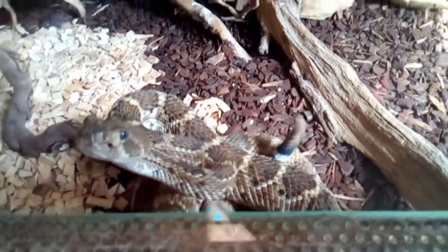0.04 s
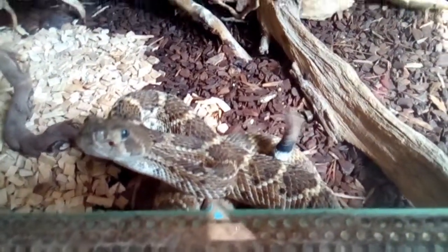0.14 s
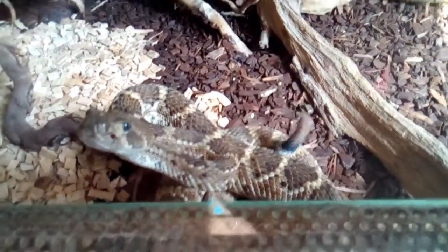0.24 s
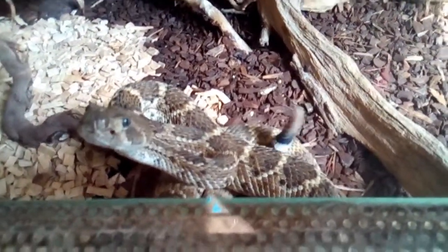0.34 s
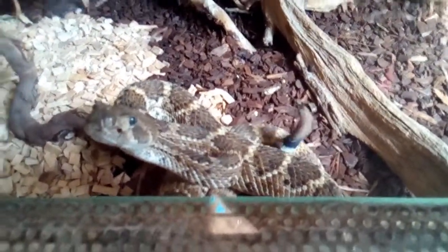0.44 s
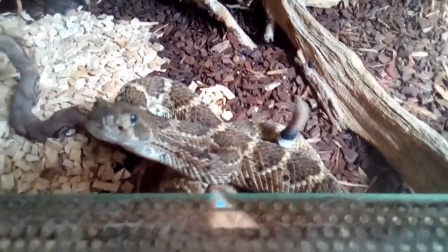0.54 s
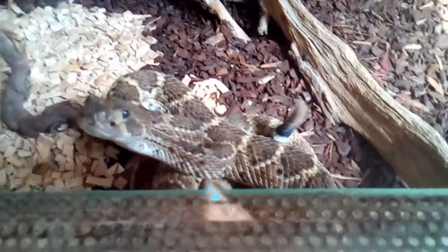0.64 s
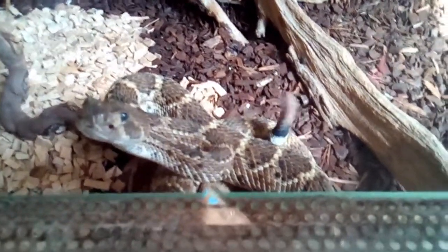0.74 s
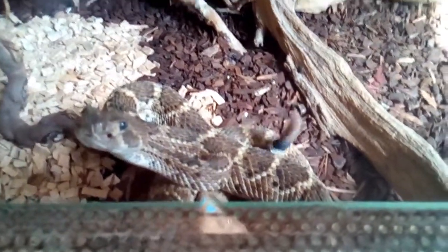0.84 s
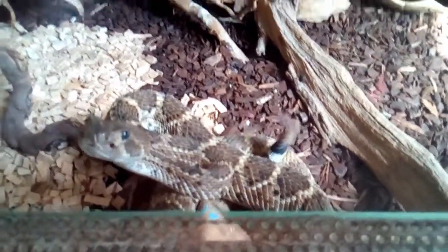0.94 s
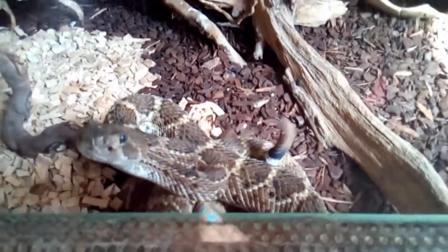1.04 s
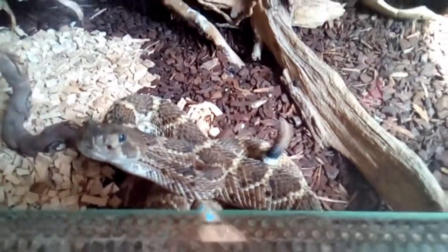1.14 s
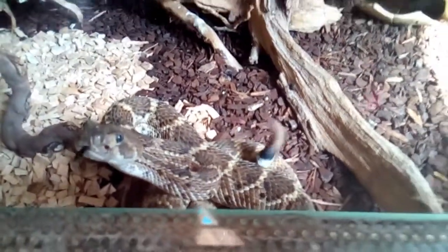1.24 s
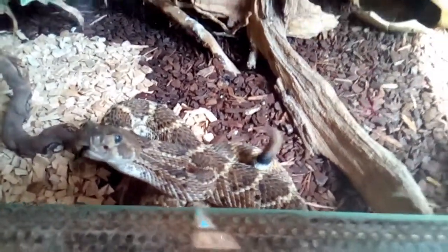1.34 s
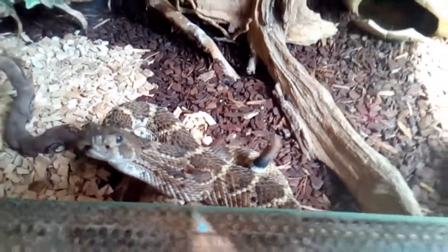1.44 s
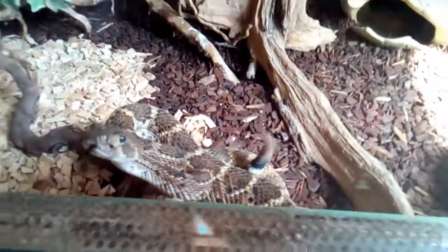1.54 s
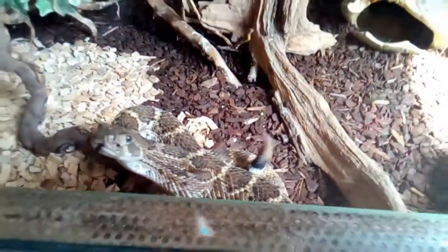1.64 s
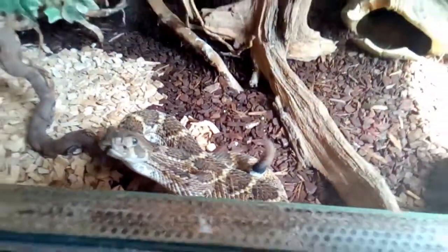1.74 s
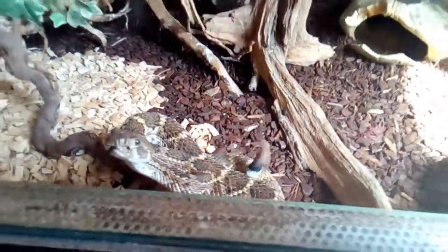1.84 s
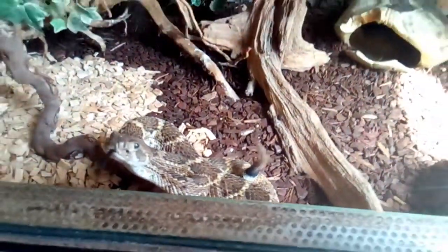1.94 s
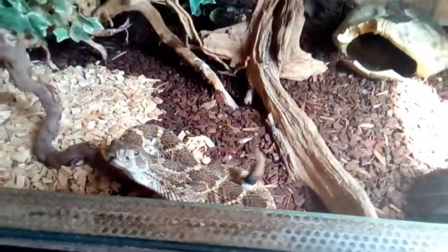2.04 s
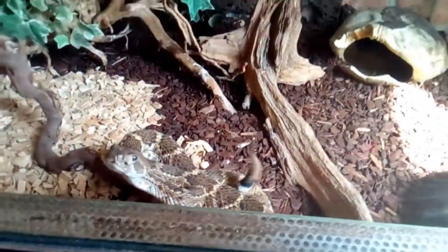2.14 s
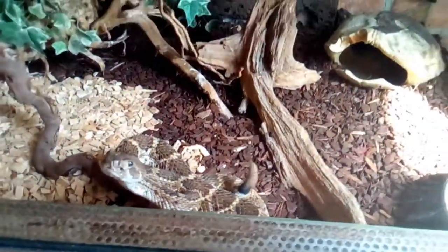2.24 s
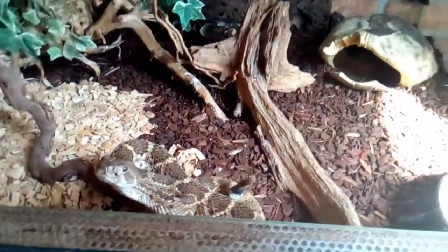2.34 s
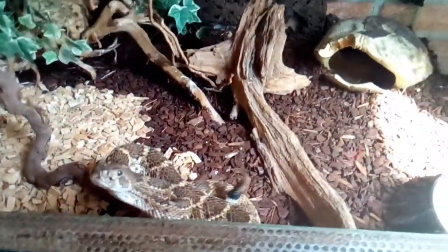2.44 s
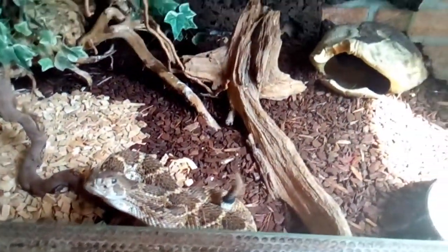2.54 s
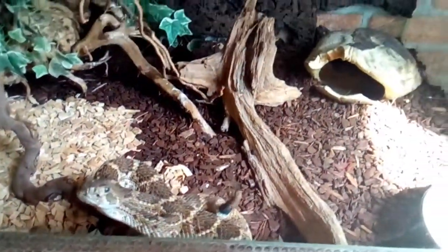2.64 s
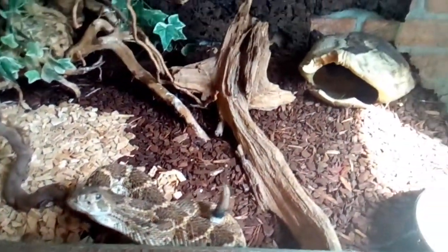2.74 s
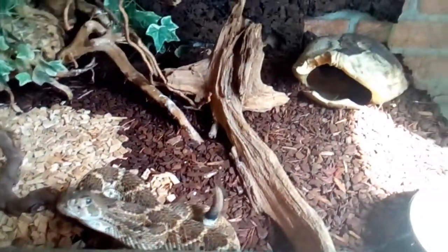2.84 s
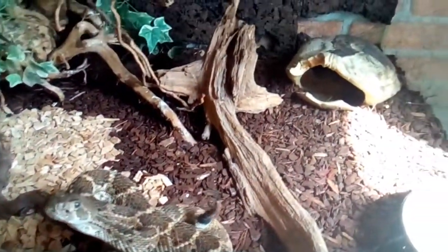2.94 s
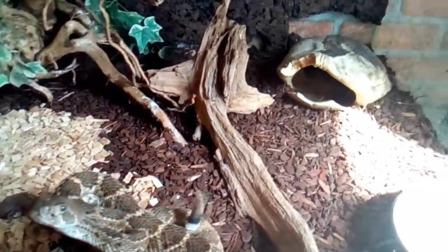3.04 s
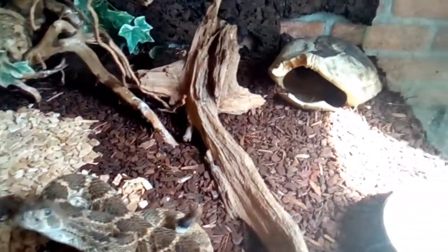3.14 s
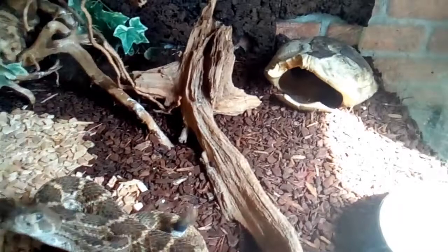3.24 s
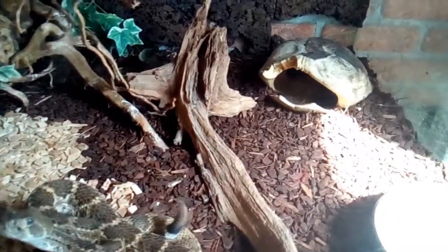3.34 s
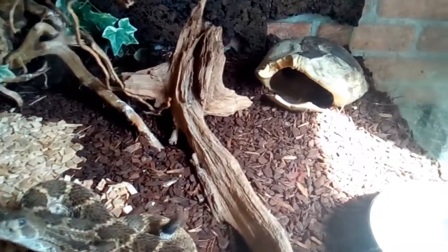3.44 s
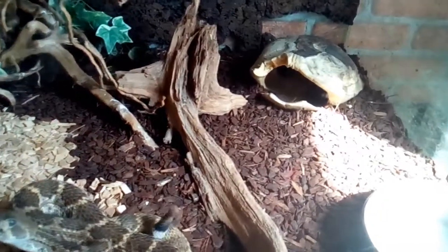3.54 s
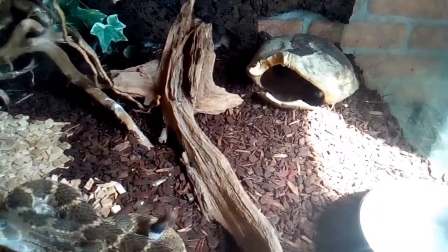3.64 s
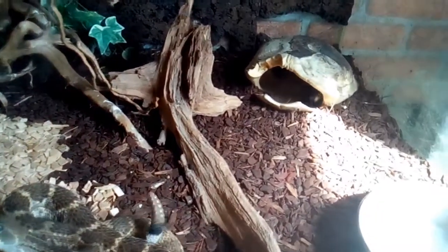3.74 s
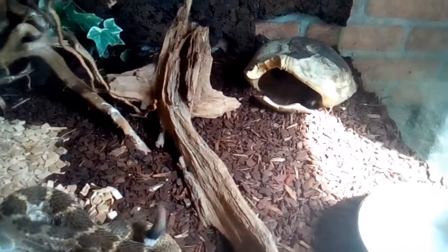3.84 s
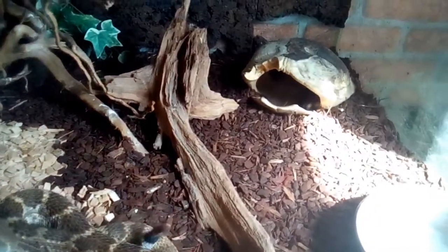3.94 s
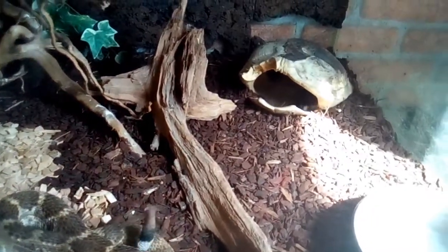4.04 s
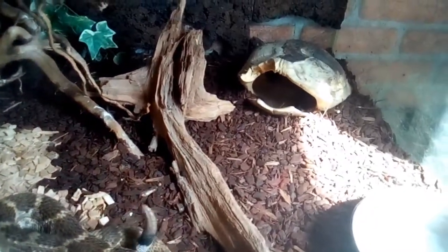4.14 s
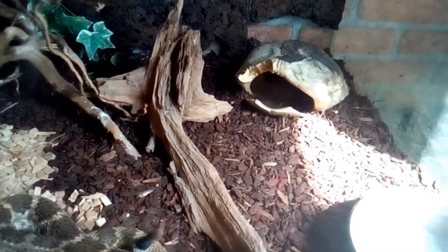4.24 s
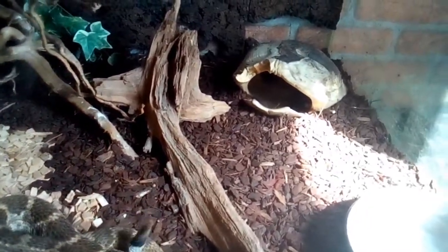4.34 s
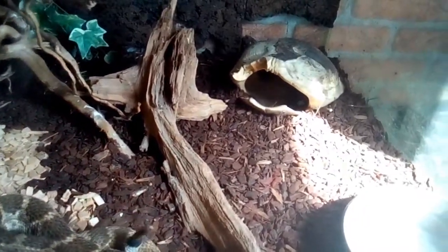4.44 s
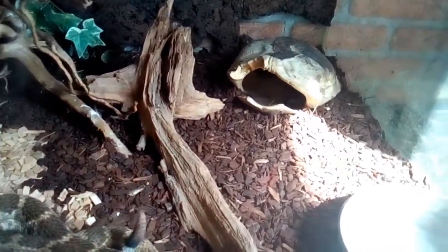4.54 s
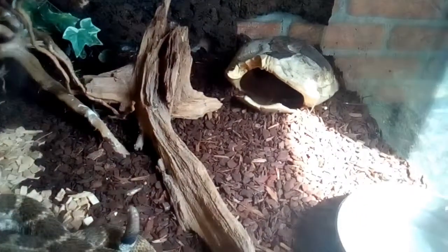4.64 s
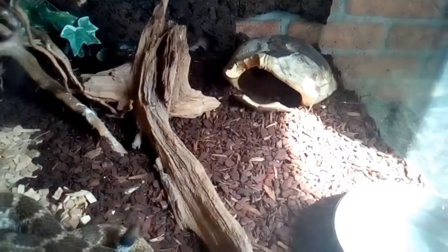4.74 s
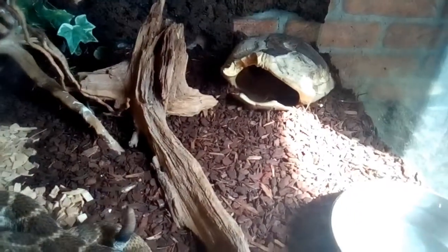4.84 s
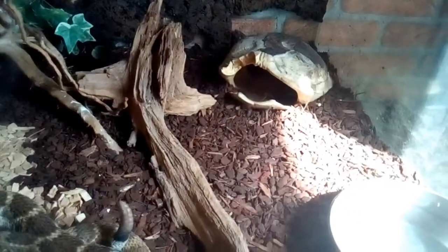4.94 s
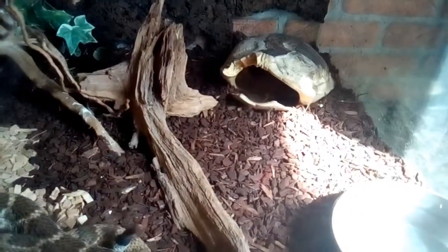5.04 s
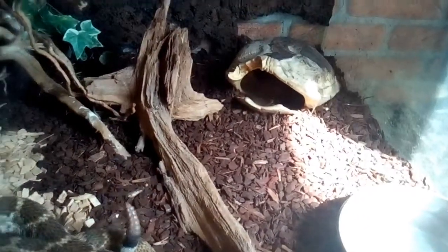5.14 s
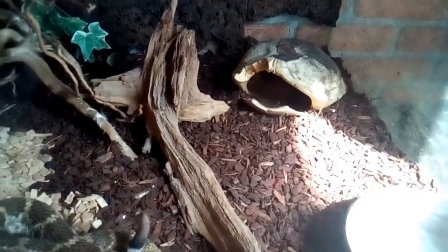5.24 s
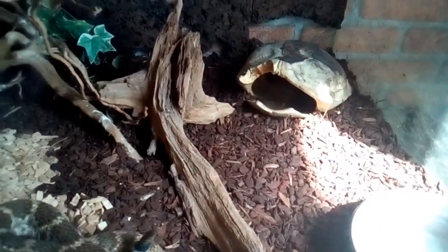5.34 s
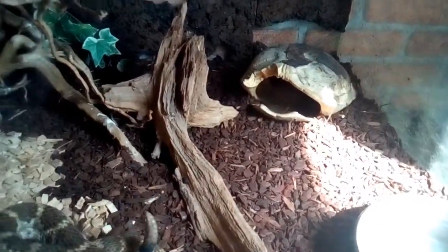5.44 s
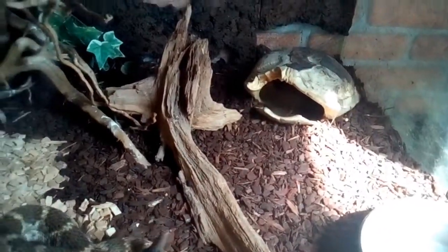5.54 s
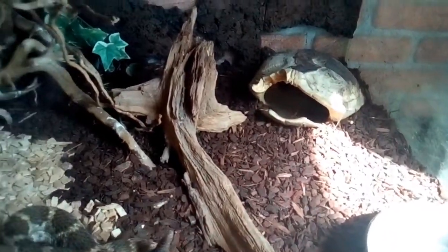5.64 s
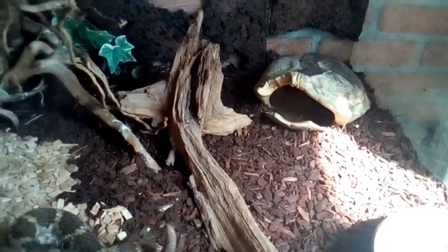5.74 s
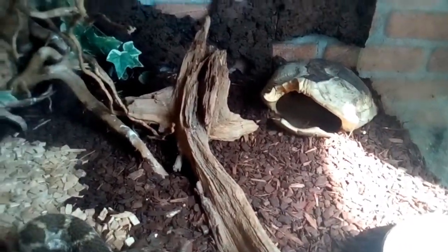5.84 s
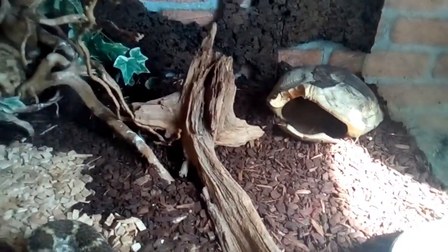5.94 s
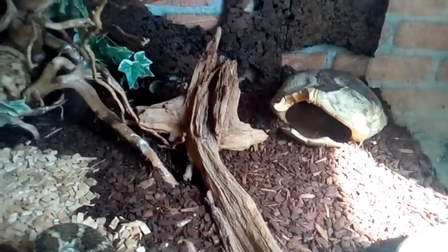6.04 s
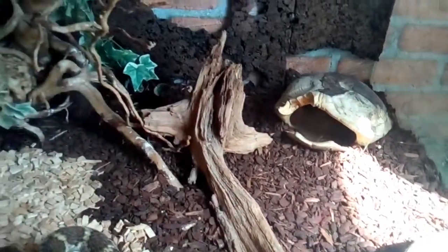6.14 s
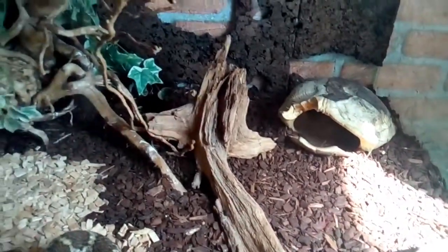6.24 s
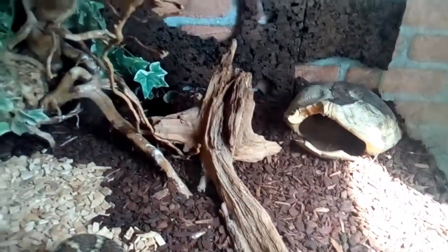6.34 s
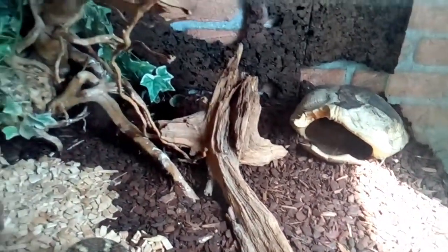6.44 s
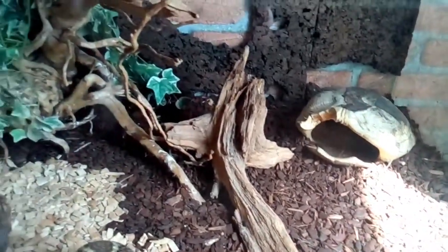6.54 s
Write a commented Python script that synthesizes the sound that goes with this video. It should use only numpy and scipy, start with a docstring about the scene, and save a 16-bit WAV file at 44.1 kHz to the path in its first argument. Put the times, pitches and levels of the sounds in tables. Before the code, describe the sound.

A rattlesnake's tail buzzes from the very start, fast, dry and high, inside a glass terrarium, with short reflections from the tank and room. Faint handling bumps touch the microphone at about 0.3, 1.0 and 1.2 seconds. The tone shifts slightly as the microphone draws back, and briefly brightens near 1.7 seconds. The buzz slows gradually. At 2.4 seconds there is one sharp handling click, and from there the rattle becomes a quick pulse of distinct flicks. Around 3.7 seconds the rhythm breaks into uneven single shakes, each a tiny double clatter of hollow segments. After 5 seconds they grow softer and further apart, with two clearer shakes near 6.1 and 6.3 seconds and a last faint one at 6.5. Quiet room air, a wavering low drone, a faint hum and a light hiss continue underneath throughout.

```python
"""Inside a glass terrarium, a rattlesnake buzzes its tail, then calms into separate dry shakes.
Every flick throws the hollow horny segments together twice, out and back; the tank and the room
ring after it. The hand-held camera adds a few soft bumps and one sharp click, and draws back early on.
Underneath sits a bed of room air, a low drone, a faint hum and background hiss."""
import sys
import numpy as np
from scipy import signal
from scipy.fft import rfft, irfft, next_fast_len
from scipy.io import wavfile

SR = 44100
rng = np.random.default_rng(int(sys.argv[2]) if len(sys.argv) > 2 else 0)


def wav_record(signal):
    """Record a signal, one row per channel, as 16-bit PCM in the file named by sys.argv[1]."""
    frames = np.transpose(np.atleast_2d(signal))
    bounded = np.clip(frames, -1, 1)
    # unit amplitude maps onto the largest positive 16-bit level
    quanta = np.round(bounded * 32767).astype(np.int16)
    wavfile.write(sys.argv[1], SR, quanta)


N = 291060

# the buzz slows as the snake calms: time_s, flicks_per_s
BUZZ_PACE = [(0, 32), (1.1, 27), (1.55, 22.5), (2.45, 18.75), (2.68, 15.75), (2.87, 19.88), (3.35, 17.76),
             (3.6, 19.3)]
# how hard the tail works in the buzz: time_s, relative_level_db
BUZZ_EFFORT = [(0, -31.5), (1.8, -32.5), (2.3, -32.8), (2.7, -31.9), (3.3, -33.2), (3.52, -32.7),
               (3.7, -34.3)]
# clatter that carries on between swings: time_s, share_of_flick_power
BUZZ_SUSTAIN = [(2.0, .54), (2.38, .32), (2.42, .11), (3.5, .01), (3.7, 0)]
# single shakes after the rhythm breaks up: time_s, relative_level_db
SHAKES = [(3.759, -37.3), (3.808, -32.8), (3.882, -37.6), (3.935, -34.5), (4.0, -36), (4.058, -36.3),
          (4.122, -35), (4.189, -32.7), (4.245, -35), (4.31, -35.6), (4.386, -35), (4.447, -39.7),
          (4.498, -33.2), (4.574, -36), (4.651, -35.5), (4.740, -37.2), (4.825, -35.3), (4.921, -48),
          (4.982, -39.2), (5.094, -35.3), (5.205, -39.9), (5.346, -43.2), (5.484, -38.7), (5.640, -42.5),
          (5.780, -44.5), (5.930, -49.7), (6.072, -37), (6.295, -40.3), (6.516, -49.3)]
# tone of the segments shaken hard: frequency_hz, level_db
HARD_TONE = [(500, -36.5), (950, -27.5), (1500, -34), (2400, -26), (3000, -18.5), (3500, -10.5), (3900, -8),
             (4450, 0), (5000, -2), (5700, -6.5), (6400, -9), (7000, -19), (8100, -32.8), (11500, -44.8),
             (16000, -48)]
# tone of the segments shaken gently: frequency_hz, level_db
GENTLE_TONE = [(1500, -36.5), (2400, -25), (2750, -17), (3150, -6.5), (3800, -5), (4500, -1), (5150, -0.5),
               (5700, -5.5), (6350, -4), (7000, -19.5), (8000, -30.5), (9300, -36.8), (11500, -46),
               (16000, -47)]
# narrow rings of the rattle in its tank: pitch_hz, width_hz, close_lift_db, far_lift_db, gentle_lift_db
RESONANCES = [(2956, 60, 3, 4, 3.5), (3208, 24, -1, 5, 6.5), (3450, 84, 6.5, 3, 6), (3676, 30, 8.5, 1, 1.5),
              (3870, 70, 0, 5, 5.5), (4156, 29, 5, 3, 2.5), (4251, 10, 8, 9, 4), (4320, 100, -0.5, 2.5, 0),
              (4550, 79, 1.5, 5.5, 5), (4733, 45, 3, 4, 7), (4950, 49, 6, 4, 4), (5270, 73, -1, 7.5, 3),
              (5450, 40, 2, 3, 6.5), (5860, 59, 5.5, 4.5, -8), (6250, 85, -2.5, 1, 3.5)]
# crossfade from the hard tone to the gentle one: time_s, gentle_share
CALMING = [(2.25, 0), (2.7, 0.25), (3.4, .8), (4.8, 0.95)]
# crossfade as the camera draws back: time_s, far_share
DRAW_BACK = [(.9, 0.04), (1.5, 1)]
# the buzz briefly brightens near 6.3 kHz: time_s, extra_gain
BRIGHT_FLARE = [(1.63, 0.02), (1.73, 2.2), (1.93, 0.2)]
# bumps and the click on the camera body: start_s, relative_level_db, pitch_hz, rise_s
BUMPS = [(0.344, -41, 170, 0.001), (1.035, -34.5, 310, .00085), (1.169, -36, 420, 0.0007),
         (2.4046, -28.7, 520, 0.00068), (2.4045, -8.5, 4730, 0.00036), (2.4045, -27.5, 7700, 0.00015)]
# tone of the room air: frequency_hz, level_db
ROOM_TONE = [(15, -30), (30, -14), (50, -14.5), (72, -12), (110, -10), (160, -7), (200, -2), (290, -0.5),
             (480, -6), (680, -3), (1000, -6.5), (1600, -13), (2200, -12), (3000, -48)]
# tone of the extra air close to the glass: frequency_hz, level_db
NEAR_GLASS_TONE = [(40, -25), (70, 2), (110, -9), (280, 0), (420, -1), (600, -22), (920, 0), (1400, -16),
                   (2500, -45)]
# swells of the low drone: peak_s, level_db, half_length_s
DRONE_SWELLS = [(1.62, -64, .2), (3.27, -61.5, .13), (5.35, -66.5, .1), (6.25, -70, .15)]
# level of the thin high hiss: time_s, level_db
HIGH_HISS_LEVEL = [(0, -70.5), (2.3, -69.5), (2.6, -74), (6.6, -76)]

CLOSE, FAR, GENTLE = range(3)  # the lift columns of RESONANCES


def rattle():
    """One rattle whose tone shifts as the camera draws back and the shaking grows gentle."""
    power = buzz() + shakes()
    far, calm = np.clip([curve(DRAW_BACK), curve(CALMING)], 0, 1)
    hard = segments(power * (1 - calm) * (1 - far), HARD_TONE, CLOSE, contacts_per_s=2800, scrape=0.42)
    hard += segments(power * (1 - calm) * far, HARD_TONE, FAR, contacts_per_s=2500, scrape=0.47)
    bright_band = filtered(hard, lambda hz: np.exp(-((hz - 6330) / 220) ** 2))
    hard += curve(BRIGHT_FLARE) * bright_band
    gentle = segments(power * calm, GENTLE_TONE, GENTLE, contacts_per_s=2600, scrape=0.45)
    return hard + gentle


def buzz(end_s=3.696, back_cycle_share=0.38):
    """Collision power of rhythmic flicks; while they are fast the segments never come to rest."""
    pace, effort_db = curve(BUZZ_PACE), curve(BUZZ_EFFORT)
    cycles = np.cumsum(pace) / SR
    # one flick a cycle, counted back from the last one in rhythm
    at = np.searchsorted(cycles, np.arange(cycles[round(end_s * SR)], 0, -1))
    flicks = tail_flicks(at / SR, effort_db[at], back_delay_s=back_cycle_share / pace[at], back_db=-2.2)
    sustain = np.clip(curve(BUZZ_SUSTAIN), 0, 1) * amp(effort_db) ** 2
    return flicks + sustain


def shakes(middling_db=-39):
    """Collision power of single shakes; a harder one spends more going out and takes longer to return."""
    times_s, level_db = np.transpose(SHAKES)
    harder_db = level_db - middling_db
    back_delay_s = 0.0225 + 0.00035 * harder_db
    back_db = -3.2 - 0.45 * harder_db
    return tail_flicks(times_s, level_db, back_delay_s, back_db)


def tail_flicks(times_s, level_db, back_delay_s, back_db, jitter_s=0.0008, scatter_db=0.4):
    """Collision power of flicks: each clatters out and, a moment later, back, no two quite alike."""
    chance = rng.standard_normal((len(times_s), 4))
    late_s, louder_db = jitter_s * chance[:, :2].T, scatter_db * chance[:, 2:].T
    out_swings = zip(times_s + late_s[0], level_db + louder_db[0])
    back_swings = zip(times_s + back_delay_s + late_s[1], level_db + back_db + louder_db[1])
    out = clatter(out_swings, half_length_s=0.008, squareness=2.7)
    back = clatter(back_swings, half_length_s=0.0069, squareness=2.1)
    return out + back


def clatter(swings, half_length_s, squareness):
    """Each swing bunches its collisions into one short, round-shouldered burst of power."""
    power = np.zeros(N)
    reach_s = 4 * half_length_s
    for peak_s, level_db in swings:
        span = np.arange(max(0, int((peak_s - reach_s) * SR)), min(N, int((peak_s + reach_s) * SR)))
        burst = np.exp(-np.abs((span / SR - peak_s) / half_length_s) ** squareness)
        power[span] += amp(level_db) ** 2 * burst
    return power


def segments(power, tone, lift_column, contacts_per_s, scrape):
    """Tiny collisions and dry scraping ring the hollow segments."""
    contacts = rng.random(N) < contacts_per_s / SR
    ticks = contacts * rng.choice([-1, 1], N) * amp(2.3 * rng.standard_normal(N))
    drive = unit(unit(ticks) + scrape * rng.standard_normal(N))

    def shell(hz):
        rings = 0
        for pitch_hz, width_hz, *lifts_db in RESONANCES:
            ring = 1j * hz * width_hz / (pitch_hz ** 2 - hz ** 2 + 1j * hz * width_hz)
            rings += (amp(lifts_db[lift_column]) - 1) * ring
        response = tone_gain(tone, hz) * (1 + rings)
        return response / np.sqrt(np.mean(np.abs(response) ** 2))
    return filtered(drive * np.sqrt(power), shell)


def reflections(x, t60_s, predelay_s, positions=8):
    """A diffuse reverb tail whose pattern drifts as the camera passes from position to position."""
    t = np.arange(SR * 3 // 4) / SR
    position = np.linspace(0, positions - 1, N)
    wet = np.zeros(N)
    for k in range(positions):
        tail = rng.standard_normal(len(t)) * amp(-60 * t / t60_s) * (t > predelay_s)
        crossfade = np.sqrt(np.clip(1 - np.abs(position - k), 0, 1))
        wet += signal.fftconvolve(x * crossfade, tail / np.linalg.norm(tail))[:N]
    return wet


def camera_bumps(low_cut_hz=130):
    """Heavily damped knocks and a click; the light camera body carries little bass."""
    t = np.arange(SR // 10) / SR
    knocks = np.zeros(N)
    for start_s, level_db, pitch_hz, rise_s in BUMPS:
        envelope = (t / rise_s * np.exp(1 - t / rise_s)) ** 2
        knock = amp(level_db) * envelope * np.sin(2 * np.pi * pitch_hz * t)
        knocks[round(start_s * SR):][:len(t)] += knock
    return filtered(knocks, lambda hz: 1j * hz / (low_cut_hz + 1j * hz))


def room_air():
    """Steady low room noise, a little fuller while the camera is close to the glass."""
    air = amp(-61.7) * noise(ROOM_TONE)
    closeness = 1 - np.clip(curve(DRAW_BACK), 0, 1)
    return air + amp(-65) * closeness * noise(NEAR_GLASS_TONE)


def low_drone(start_db=-67.5, fade_db_per_s=2.1):
    """A wavering band of noise near 224 Hz that fades slowly and swells a few times."""
    t = np.arange(N) / SR
    power = amp(start_db - fade_db_per_s * t) ** 2
    for peak_s, level_db, half_length_s in DRONE_SWELLS:
        power += amp(level_db) ** 2 * np.exp(-((t - peak_s) / half_length_s) ** 2)
    tone = [(150, -28), (200, -8.5), (224, -3), (245, -8.5), (330, -25), (500, -49)]
    return np.sqrt(power) * noise(tone)


def background_hiss():
    """A broad, steady hiss, plus a thin, very high hiss that drops as the buzz calms."""
    broad = noise([(1500, -31), (2300, -2), (4500, 2), (6500, -7.5),
                   (8000, -14.5), (13000, -17), (16000, -14)])
    high = noise([(12000, -52), (13800, -12), (14600, -1), (15500, 1), (16000, -42)])
    return amp(-65) * broad + amp(curve(HIGH_HISS_LEVEL)) * high


def faint_hum():
    """A narrow band of noise, heard as an unsteady hum near 70 Hz."""
    return amp(-82.5) * noise([(55, -45), (68, -3), (73, 0), (80, -12), (100, -50)])


def noise(tone):
    """Steady noise at rms 1, shaped by points of frequency_hz, level_db."""
    return unit(filtered(rng.standard_normal(N), lambda hz: tone_gain(tone, hz)))


def tone_gain(tone, hz):
    """Gain of an EQ curve drawn through points of frequency_hz, level_db on a log axis."""
    frequency_hz, level_db = np.transpose(tone)
    return amp(np.interp(np.log(hz + 1), np.log(frequency_hz), level_db))


def filtered(x, response):
    """x through a filter given as gain against frequency."""
    size = next_fast_len(N + SR // 2)
    return irfft(rfft(x, size) * response(np.fft.rfftfreq(size, 1 / SR)), size)[:N]


def curve(rows):
    """Rows of time_s, value become one value per sample."""
    return np.interp(np.arange(N) / SR, *np.transpose(rows))


def amp(db):
    """Decibels to gain."""
    return 10 ** (np.asarray(db) / 20)


def unit(x):
    """x at rms 1."""
    return x / np.sqrt(np.mean(x ** 2) + 1e-20)


def scene():
    """The mono mix: the rattle direct, off the glass and from the room, with bumps and a quiet bed."""
    snake = rattle()
    glass = amp(-8.0) * reflections(snake, t60_s=0.12, predelay_s=0.00159)
    room = amp(-10.0) * reflections(snake, t60_s=0.59, predelay_s=0.01)
    bumps = camera_bumps()
    bed = room_air() + low_drone() + background_hiss() + faint_hum()
    return (amp(-1.53) * snake + glass + room + bumps + bed)[None]


def record(dry):
    """The camera keeps nothing above its band limit."""
    return filtered(dry[0], lambda hz: hz < 15550)[None]


dry = scene()
out = record(dry)
wav_record(out)
```